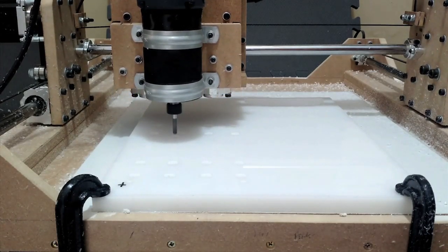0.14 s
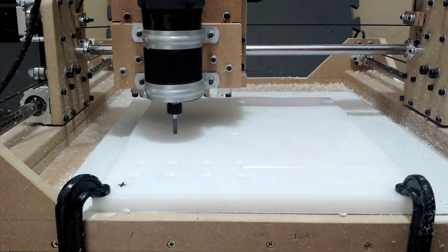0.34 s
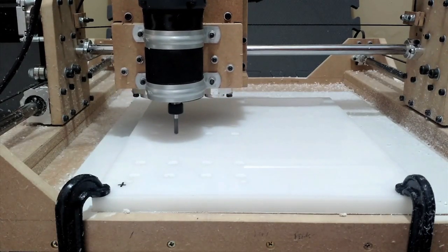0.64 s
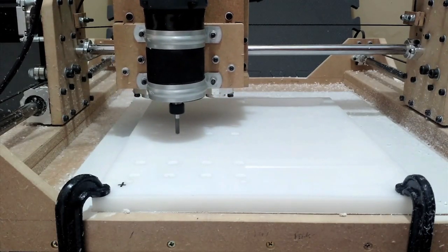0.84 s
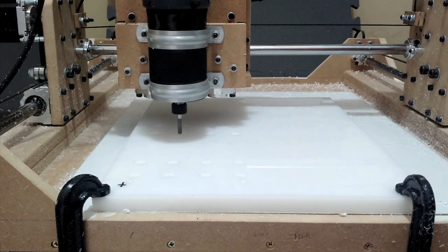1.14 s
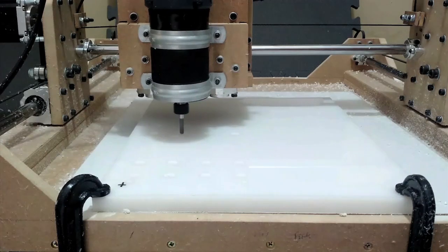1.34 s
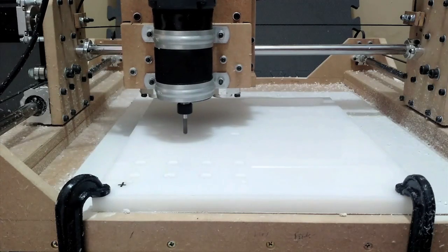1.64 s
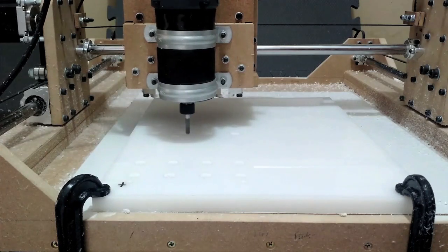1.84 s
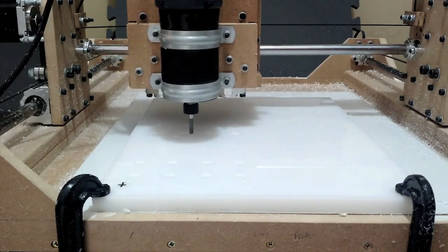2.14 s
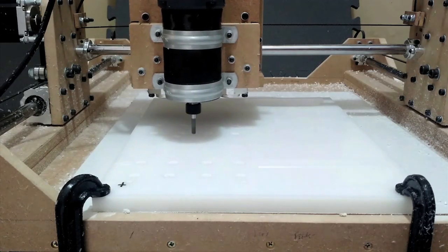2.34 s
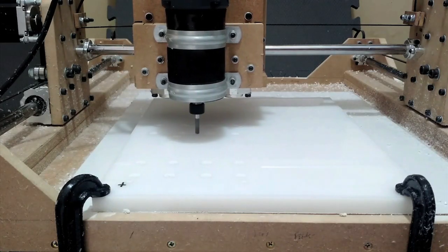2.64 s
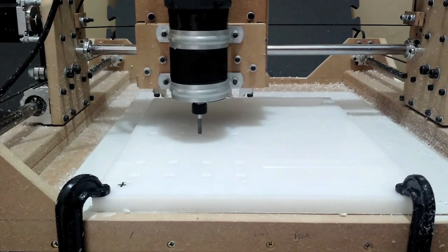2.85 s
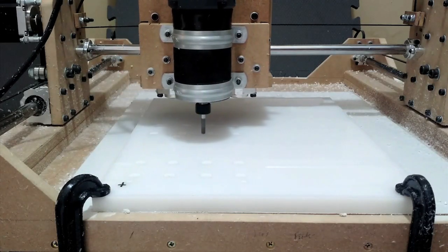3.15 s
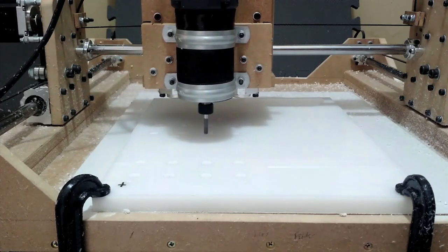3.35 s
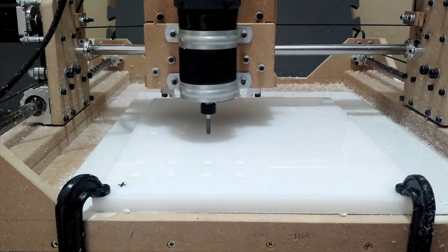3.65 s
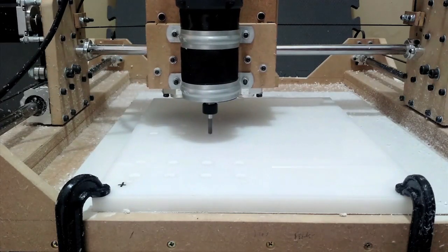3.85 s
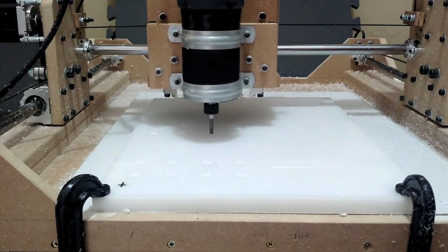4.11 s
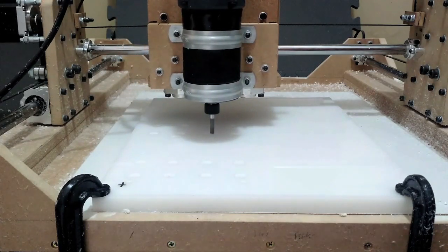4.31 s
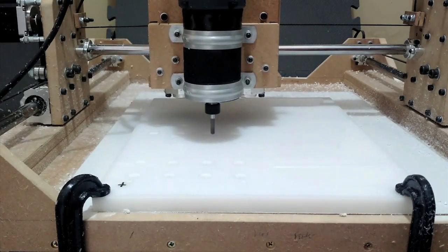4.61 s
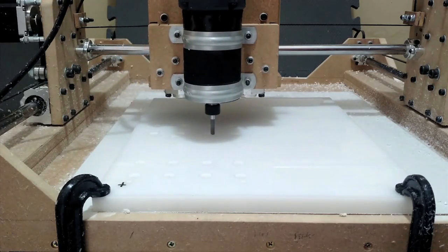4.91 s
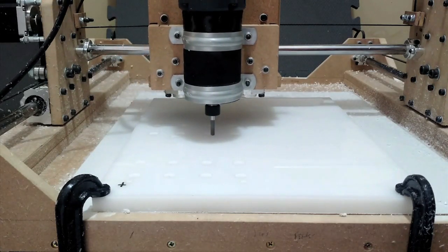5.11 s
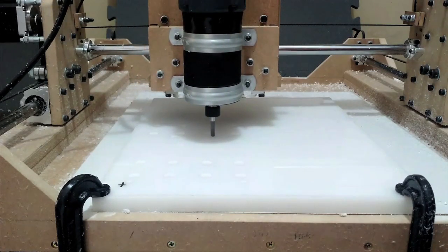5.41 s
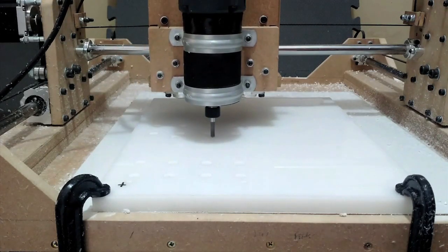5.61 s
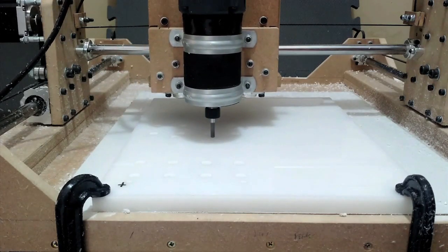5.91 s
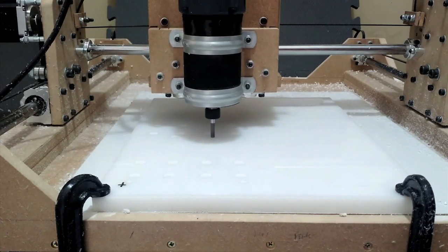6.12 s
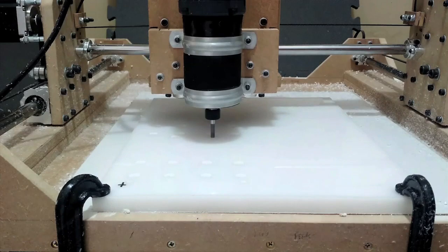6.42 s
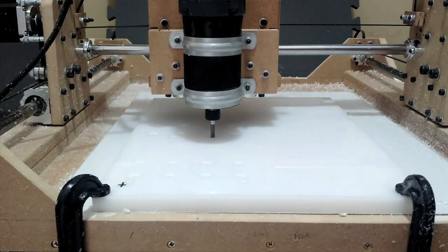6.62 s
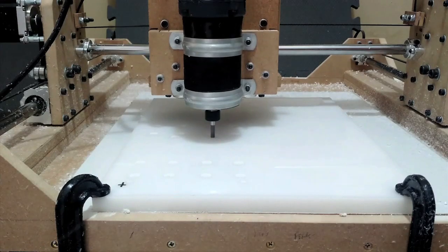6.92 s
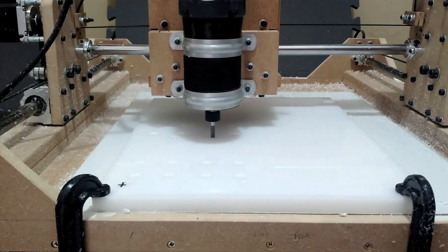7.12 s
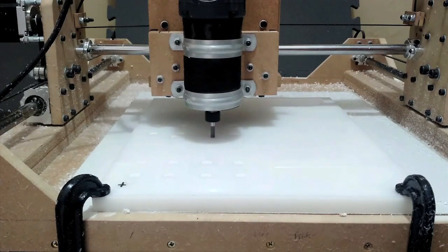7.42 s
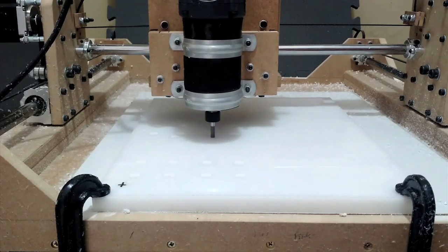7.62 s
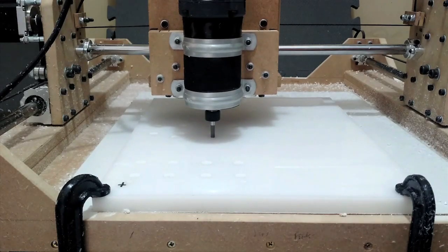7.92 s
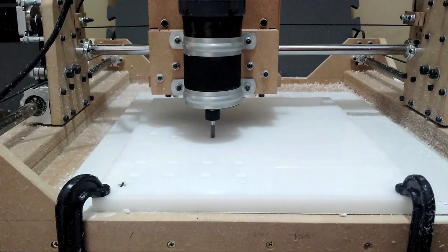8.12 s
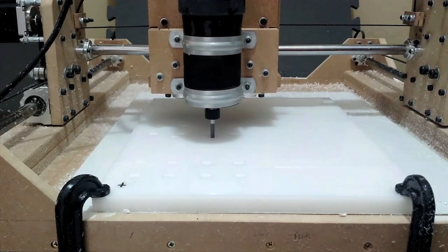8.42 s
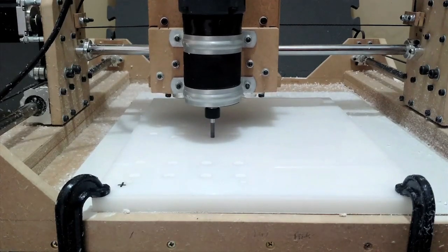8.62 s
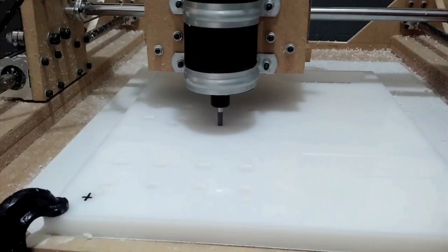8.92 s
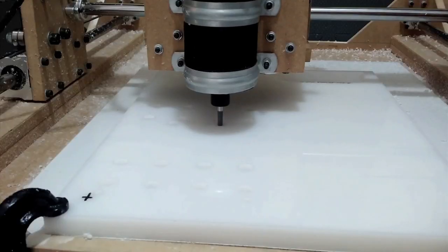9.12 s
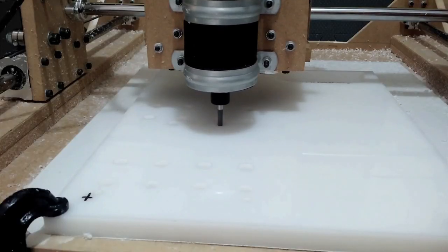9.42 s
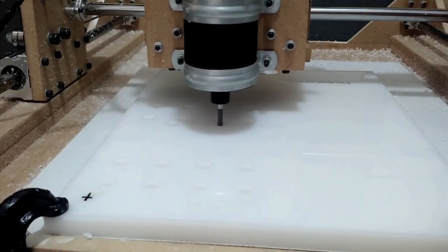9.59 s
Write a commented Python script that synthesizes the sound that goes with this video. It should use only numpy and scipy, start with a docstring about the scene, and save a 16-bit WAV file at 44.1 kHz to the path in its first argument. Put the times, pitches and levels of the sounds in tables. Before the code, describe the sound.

In a workshop, a small cutting machine's spindle runs without pause, a bright layered whine with a piercing whistle and raspy rushing air. Faint stepper hums enter soon after the start, changing pitch with each move. Past the midpoint the whine sags slightly, climbs back, then jumps abruptly higher with stronger top hiss. Heard close by, from a phone at the table edge.

```python
"""A small CNC router works on a plastic sheet in a workshop, heard from a phone at the edge of the table.
At first the spindle whines near 575 turns a second: sines at multiples of its speed, over coloured noise
for rushing air and a rasp. From 0.55 s stepper motors hum faintly at the step rate of each move. After 5 s
the whine sags in the cut to about 550 turns a second and climbs again from 6.8 s. From 7.9 s the pitch is
abruptly higher, with stronger top hiss and a narrow, rough hum; a second axis creeps until 9.2 s."""
import sys
import numpy as np
from scipy import signal
from scipy.fft import rfft, irfft
from scipy.io import wavfile
from scipy.ndimage import uniform_filter1d

SR = 44100
rng = np.random.default_rng(int(sys.argv[2]) if len(sys.argv) > 2 else 0)


def generate_wav(sig):
    """Save sig (samples, or channels by samples) to the path in sys.argv[1] as 16-bit PCM at SR."""
    pcm = np.round(np.clip(np.atleast_2d(sig).T, -1, 1) * 32767).astype(np.int16)
    wavfile.write(sys.argv[1], SR, pcm)


N = 429975
T = np.arange(N) / SR
HZ = np.maximum(np.arange(N // 2 + 1) * SR / N, 1)  # spectrum bins, kept above 0 for the logarithm
MOVE_FADE_S = 0.025  # attack and release of a move


def undb(db):
    """Decibels to gain: amplitude grows tenfold every 20 dB."""
    return 10 ** (np.asarray(db) / 20)


def curves(table):
    """Envelopes by linear interpolation in time: one for each column after the first."""
    s, *columns = np.transpose(table)
    return [np.interp(T, s, column) for column in columns]


def over_hz(table):
    """Spectral envelope by interpolation of (Hz, value) points on a log-frequency axis."""
    hz, value = np.transpose(table)
    return np.interp(np.log(HZ), np.log(hz), value)


def walk(rate):
    """Low-passed random fluctuation of standard deviation 1 that changes about rate times a second."""
    s = np.arange(0, N / SR, 1 / 2000)
    hz = np.arange(len(s) // 2 + 1) * SR / N
    lowpass = np.exp(-(hz / rate) ** 2)
    slow = irfft(rfft(rng.standard_normal(len(s))) * lowpass, len(s))
    return np.interp(T, s, slow / slow.std())


def gate(start, end, ramp_s):
    """Trapezoidal envelope: rises from 0 to 1 in ramp_s, holds, and is back at 0 by the end."""
    return np.clip(np.minimum(T - start, end - T) / ramp_s, 0, 1)


def resonance(hz, centre_hz, width_hz):
    """Lorentzian resonance curve, 1 at the centre."""
    return 1 / (1 + (2 * (hz - centre_hz) / width_hz) ** 2)


def tone(phase, db, pan_db=0, lead=0):
    """A sine of given rms level, with a level (dB) and phase (rad) difference between the two ports."""
    ports = [undb(db + side * pan_db) * np.sin(phase + side * lead) for side in (.5, -.5)]
    return np.sqrt(2) * np.array(ports)


def two_ports(phase, left_db, right_db, lead):
    """A sine with its own level at each port: mean level plus level difference."""
    return tone(phase, (left_db + right_db) / 2, left_db - right_db, lead)


def rumbles(fade_s=.05, bed_db=-106, bed_hz=35, bed_width_hz=40, surge_db=5):
    """Band-limited noise: a deep bed independent at each port, and soft, higher rumbles common to both."""
    # soft rumbles: start_s, end_s, level_db
    rumble_times = [(.1, .38, -90), (2.92, 3.4, -90), (5.36, 5.56, -91)]
    # their band: centre_hz, width_hz
    rumble_band = (89, 45)
    low = irfft(rfft(rng.standard_normal(N)) * resonance(HZ, *rumble_band), N)
    bed = irfft(rfft(rng.standard_normal((2, N))) * resonance(HZ, bed_hz, bed_width_hz), N)
    bed = bed / bed.std() * undb(bed_db + surge_db * walk(4))
    envelope = sum(undb(db) * gate(start, end, fade_s) for start, end, db in rumble_times)
    return bed + low / low.std() * envelope


def steppers(waver_db=0.6, octave_db=-13, half_db=-9, jitter=0.008, ramp_jitter=0.04,
             ramp_db=-2.5, ramp_flutter_db=3):
    """Periodic steps give a tone at the step rate; uneven steps double the period, an octave below."""
    # carriage moves, level before frame lift and ramp change:
    # start_s, end_s, entry_hz, cruise_hz, exit_hz (step rates), to_cruise_s, from_cruise_s, level_db
    moves = [(.55, 2.68, 122, 149.6, 130, 0.269, .25, -88),
             (4.03, 4.92, 154.7, 249.5, 166, 0.22, 0.22, -82.5),
             (4.98, 6.42, 166, 166, 150, .05, 0.074, -88.5),
             (6.42, 7.1, 205, 194.6, 180, 0.098, 0.092, -87.5), (6.96, 7.87, 155, 249.6, 200, .22, .1, -86),
             (7.85, 10.8, 200, 250, 250, 0.062, .05, -85)]
    # resonance of the frame over step rate: centre_hz, width_hz, lift_db
    frame = (139, 13, 7.2)
    # slow move of a second axis: start_s, end_s, step_rate_hz, level_db
    creep_move = (7.87, 9.17, 46, -90)
    feed = 0
    frame_hz, frame_width_hz, lift_db = frame
    for start, end, entry_hz, cruise_hz, exit_hz, rise_s, fall_s, db in moves:
        corners_s = [start, start + rise_s, end - fall_s, end]
        hz = np.interp(T, corners_s, [entry_hz, cruise_hz, cruise_hz, exit_hz])
        ramping = np.clip(np.abs(hz - cruise_hz) / 20, 0, 1)
        ragged = (jitter + ramp_jitter * ramping) * walk(30)
        phase = 2 * np.pi * np.cumsum(hz * (1 + ragged)) / SR
        db = db + ramping * (ramp_db + ramp_flutter_db * walk(14))
        uneven = undb(half_db) * np.clip((hz - 200) / 50, 0, 1)  # only at the faster feed
        hum = np.sin(phase) + undb(octave_db) * np.sin(2 * phase) + uneven * np.sin(phase / 2)
        level = undb(db + lift_db * resonance(hz, frame_hz, frame_width_hz))
        feed = feed + level * gate(start, end, MOVE_FADE_S) * hum
    start, end, creep_hz, creep_db = creep_move
    creep = undb(creep_db) * gate(start, end, MOVE_FADE_S) * np.sin(2 * np.pi * creep_hz * T)
    return np.sqrt(2) * (feed + creep) * undb(waver_db * walk(5.6))


def fan(shaft, churn=0.62, churn_hz=30, lead=.2):
    """Blade-passing tone at 7 times the shaft speed; chopped uneven air smears part of it into a band."""
    # rough fan tone: time_s, level_db
    fan_level = [(0, -57), (2, -56), (4.5, -56.5), (5.5, -54), (6.2, -56), (7.4, -59), (8.5, -53),
                 (9.75, -57)]
    db, = curves(fan_level)
    direct, quadrature = (tone(7 * shaft + shift, db, lead=lead) for shift in (0, np.pi / 2))
    smeared = direct * walk(churn_hz) + quadrature * walk(churn_hz)
    return (direct + churn * smeared) / np.sqrt(1 + 2 * churn ** 2)  # the mean power stays the same


def rush(shaft, pulsing=0.04, sputter_db=0.37, roar_db=-57.5, wander_db=0.58, hiss_follow=0.64):
    """Broadband noise filtered by housing resonances; its rasp is amplitude-modulated once a turn."""
    # broad colour, relative spectral level: frequency_hz, level_db
    rush_colour = [(25, -37), (80, -33), (125, -26), (200, -24.5), (310, -18.5), (500, -7), (760, -4),
                   (1400, -3.5), (2200, -3.5), (2600, -6), (3000, -4), (4200, 3.5), (6700, -3),
                   (8200, -7.5), (11300, -13.5), (14000, -19.5)]
    # resonances of housing and frame: centre_hz, width_hz, lift_db
    housing = [(850, 39, 6), (923, 36, 6.5), (986, 97, 6), (1176, 120, 3.5), (1430, 32, 4.5),
               (1570, 104, 6), (1704, 94, 3), (1930, 29, 5), (2870, 47, 8), (3627, 380, 6), (3900, 57, 3.5),
               (4042, 110, 6), (4550, 670, 1.5), (9260, 960, 2.5), (13300, 1500, 7.5)]
    # likeness of the noise at the two ports: frequency_hz, correlation (-1 to 1)
    likeness = [(40, -0.71), (150, 0.22), (700, 0.67), (950, 0.98), (1350, 1), (1650, 0.99), (2100, -0.12),
                (2480, -0.55), (2640, -0.85), (2950, -0.28), (3400, 0.91), (3750, 0.93), (4200, 0.95),
                (4750, -0.087), (5250, -0.72), (6700, 0.79), (8200, -0.55), (10000, 0.54), (11400, -0.35),
                (12900, 0.8), (14300, -0.72)]
    # dip in the shared part of the noise near 2.6 kHz: centre_hz, width_hz, depth (0 to 1)
    shared_dip = (2620, 270, .85)
    # airy hiss above the rasp: time_s, level_db
    air_level = [(0.0, -50.5), (0.78, -53), (2.19, -51.5), (2.82, -54), (3.27, -52), (4.35, -53.5),
                 (4.62, -50.5), (5.19, -53.5), (5.91, -51.5), (6.51, -52), (7.86, -51), (9.74, -54.5)]
    # level of the rasp, with small random rises and dips: time_s, level_db
    rasp_level = [(0.0, -46.0), (0.51, -45.5), (1.05, -48), (1.26, -45.5), (2.04, -45.5), (2.25, -44.5),
                  (2.34, -49), (2.58, -45), (2.61, -48), (2.97, -45), (3.18, -48.5), (3.24, -46),
                  (3.54, -47.5), (3.6, -44.5), (4.2, -47.0), (4.74, -44.0), (4.77, -48), (5.07, -44.0),
                  (5.13, -47), (5.73, -45.5), (6.09, -48.5), (6.33, -45), (6.39, -48.5), (6.54, -45),
                  (6.75, -49), (6.99, -45), (7.17, -46.5), (7.65, -46.5), (7.74, -44.5), (8.07, -45),
                  (8.61, -45.5), (9.74, -47.5)]
    # top hiss, stronger from 7.9 s: time_s, level_db
    hiss_level = [(0, -64), (1.2, -61.5), (3.7, -61), (4.3, -62.5), (6.3, -64), (7.3, -62.5), (7.88, -67),
                  (7.9, -59.5), (9.75, -57)]
    # narrow, rough hum heard late: centre_hz, width_hz, level_db
    late_hum = (900, 24, -64)

    db = over_hz(rush_colour) + sum(lift * resonance(HZ, hz, width) for hz, width, lift in housing)
    # correlation is joined as an angle
    angles = [(hz, np.arccos(np.clip(c, -.999, .995))) for hz, c in likeness]
    alike = np.cos(over_hz(angles))
    mid, side = (rfft(rng.standard_normal(N)) * undb(db) * np.sqrt(1 + s * alike) for s in (1, -1))
    dip_hz, dip_width_hz, depth = shared_dip
    mid = mid * (1 - depth * resonance(HZ, dip_hz, dip_width_hz) ** 2)
    ports = np.array([mid + side, mid - side])

    def part(share, lo, hi):
        """Filtered register of the rush, scaled by the power of the unfiltered rush from lo to hi Hz."""
        power = np.sum(np.abs(ports[:, (HZ > lo) & (HZ < hi)]) ** 2) / N ** 2
        return irfft(ports * share, N) / np.sqrt(power)

    # crossovers between the registers
    low = 1 / (1 + (HZ / 2400) ** 8)
    high = 1 - 1 / (1 + (HZ / 5100) ** 16)
    top = 1 - 1 / (1 + (HZ / 9800) ** 14)
    roar, rasp = part(low, 720, 1060), part(1 - low - high, 3000, 5000)
    air, hiss = part(high - top, 5300, 8500), part(top, 9800, 14000)

    roar = roar * undb(roar_db + 1.64 * walk(2.0))
    air = air * undb(curves(air_level)[0] + 0.75 * walk(14))
    rasp_db = curves(rasp_level)[0] + wander_db * walk(11.0)
    rasp = rasp * (1 + pulsing * np.cos(shaft)) * undb(rasp_db + sputter_db * walk(180))
    # the top hiss leans right and swells a little with the rasp
    hiss_pan_db = np.array([[-.8], [.8]])
    follow_db = hiss_follow * (rasp_db - rasp_db.mean())
    hiss_db = curves(hiss_level)[0] + hiss_pan_db + follow_db + 0.66 * walk(6)
    hum_hz, hum_width_hz, hum_db = late_hum
    hum = irfft(rfft(rng.standard_normal(N)) * resonance(HZ, hum_hz, hum_width_hz), N)
    hum = hum / hum.std() * undb(hum_db) * (T > 7.895)  # heard from here on (s)
    return roar + rasp + air + hiss * undb(hiss_db) + hum


def whistle(shaft, speed, fade_db=0.94, sway=0.67):
    """High rotor tone interfering with its own reflections, which grow while the pitch glides."""
    # level at each port: time_s, left_db, right_db
    whistle_level = [(0.0, -68, -48), (0.63, -54, -45.5), (1.11, -70, -47.5), (1.35, -60.5, -51.5),
                     (1.83, -60, -50), (2.07, -51, -54), (2.43, -58.5, -62), (2.52, -57.0, -55),
                     (3.6, -56.5, -52.0), (3.84, -62.5, -49), (4.26, -72, -55), (4.5, -76, -55),
                     (4.74, -55, -55.0), (4.98, -55, -58), (5.58, -52.5, -54), (5.73, -51.5, -65),
                     (6.24, -55.5, -53), (6.75, -51.5, -62), (6.96, -56.0, -52.5), (7.38, -47.5, -51.0),
                     (7.53, -57.0, -48), (7.98, -51.5, -52), (8.19, -52, -49), (8.58, -58.5, -48),
                     (9.0, -49.5, -48), (9.74, -57, -44.5)]
    # break-ups, where the ports also swing through opposite phase: time_s, dip_db
    dropouts = [(2.41, 6), (4.92, 4), (5.3, 6), (5.44, 2), (5.68, 3), (6.11, 2), (7.13, 5), (7.31, 3),
                (7.7, 3), (7.88, 3)]
    dropout_s = .035  # half length
    order = 16  # multiple of the shaft speed
    reflected_share, glide_share = .12, .3  # reflection at steady speed, and what a full glide adds

    slope = np.minimum(np.abs(np.gradient(speed)) * SR, 20)  # Hz per second
    glide = np.clip(uniform_filter1d(slope, SR // 2) / 12, 0, 1)
    left, right = curves(whistle_level)
    swell, lead = fade_db * walk(7), sway * walk(4.1)
    for s, dip_db in dropouts:
        bell = np.exp(-((T - s) / dropout_s) ** 2)
        swell, lead = swell - dip_db * bell, lead + np.pi * bell
    direct, quadrature = (two_ports(order * shaft + shift, left + swell, right + swell, lead)
                          for shift in (0, np.pi / 2))
    reflected = sum(wave * np.array([walk(24), walk(24)]) for wave in (direct, quadrature))
    share = reflected_share + glide_share * glide
    return (direct + share * reflected) / np.sqrt(1 + 2 * share ** 2)


def spindle(shaft, flutter_db=1.0, ring_fade_db=2.0, fade_db=4.0, eighth_fade_db=2.5):
    """Harmonics of the shaft speed; standing waves make each port hear them swell and fade."""
    # harmonics 1 to 6 of the shaft, each: time_s, level_db
    first_level = [(0.0, -55), (2.29, -64.5), (2.98, -53), (4.35, -60), (4.92, -52.5), (5.45, -57.5),
                   (6.3, -52), (6.86, -63), (7.21, -56), (7.58, -69.5), (7.84, -59), (8.6, -67.5),
                   (9.75, -62.5)]
    second_level = [(0.0, -51.5), (0.45, -58), (1.24, -51), (2.29, -52.0), (2.44, -55.5), (3.33, -48),
                    (4.43, -55), (5.42, -48.5), (5.57, -59), (5.82, -52), (6.12, -57.5), (6.27, -50.0),
                    (7.01, -51.5), (7.21, -61), (7.36, -51), (7.46, -59), (8.66, -48.5), (9.75, -56.0)]
    third_level = [(0.0, -52), (0.96, -59.0), (2.19, -50), (2.64, -56.0), (3.9, -50), (4.02, -57),
                   (4.35, -51.5), (4.44, -65), (4.77, -67.5), (4.83, -60), (5.4, -46.0), (5.76, -53),
                   (6.45, -55), (6.75, -70), (6.93, -50.5), (7.23, -54.5), (7.44, -66), (7.83, -55.5),
                   (8.4, -64), (8.85, -67), (8.97, -54.5), (9.74, -62)]
    fourth_level = [(0, -64), (2.06, -60), (2.84, -66), (3.78, -60), (4.23, -65.5), (4.5, -62), (4.92, -70),
                    (5.07, -60.5), (5.43, -65.5), (6.33, -54), (7.41, -65.5), (9.03, -64), (9.75, -70)]
    fifth_level = [(0, -66), (.65, -58), (1.7, -73), (3.3, -68.5), (5.1, -59), (5.5, -60), (6.0, -54),
                   (7.7, -64), (8.0, -60), (9.75, -57)]
    sixth_level = [(0, -62), (1.3, -63), (2.2, -55.5), (3.3, -57.5), (4.2, -61), (5.1, -59), (5.5, -59.5),
                   (6.5, -58), (7.1, -61), (7.6, -61.5), (8.2, -64), (9.75, -63)]
    # ringing eighth harmonic: time_s, left_db, right_db
    eighth_level = [(0, -66, -66), (.42, -58, -61), (.65, -58, -57), (1.3, -52, -50), (1.8, -59, -62),
                    (2.4, -51.5, -66), (3.68, -49.5, -54), (4.1, -53, -64), (4.75, -53, -71),
                    (4.98, -51.5, -49), (5.35, -57, -64), (6, -50, -54), (6.12, -61, -61), (6.4, -51, -56),
                    (7.7, -51, -54), (8.08, -57, -62), (8.3, -52, -59), (9.75, -58, -67)]
    # twelfth harmonic, which comes out as the pitch climbs again: time_s, level_db
    twelfth_level = [(0, -66), (6.95, -68), (7.25, -60), (7.8, -63), (8, -72)]
    # weaker harmonics: order (multiple of the speed), level_db, port_phase_rad
    overtones = [(9, -67.5, 3), (10, -69.5, 0), (11, -71, 1), (13, -73.5, 0), (14, -73.5, -0.5)]

    first, second, third, fourth, fifth, sixth, twelfth = (curves(table)[0] for table in (
        first_level, second_level, third_level, fourth_level, fifth_level, sixth_level, twelfth_level))
    out = tone(shaft, first + flutter_db * walk(6.8), lead=0.67)
    out += tone(2 * shaft, second + flutter_db * walk(8.1), lead=0.05)
    out += tone(3 * shaft, third + flutter_db * walk(12), pan_db=-1.0, lead=0.2)
    out += tone(4 * shaft, fourth + ring_fade_db * walk(11.7), pan_db=-6.5, lead=0.89)
    # the fifth reaches the ports near opposite phase
    out += tone(5 * shaft, fifth + ring_fade_db * walk(8), lead=np.pi + .2 * walk(3.2))
    out += tone(6 * shaft, sixth + ring_fade_db * walk(11), pan_db=2.5)
    left, right = (db + eighth_fade_db * walk(16) for db in curves(eighth_level))
    out += two_ports(8 * shaft + 0.27 * walk(25), left, right, 0.55 + .7 * walk(2.1))
    out += tone(12 * shaft, twelfth + ring_fade_db * walk(15))
    for order, db, lead in overtones:
        out += tone(order * shaft, db + fade_db * walk(22), 2 * walk(0.83), lead + 0.62 * walk(0.92))
    return out


def scene():
    """Phase is the integral of speed: one slightly unsteady shaft sets whine, whistle, fan and rasp."""
    # pitch of the whine, which sags in the cut, climbs again and is abruptly higher from 7.9 s:
    # time_s, speed_hz (turns a second)
    spindle_speed = [(0, 574.2), (0.8, 573.1), (1.3, 573.1), (2, 574.7), (2.8, 576.1), (3.4, 575.8),
                     (4.7, 575.2), (5.3, 565.7), (5.9, 557.4), (6.35, 551.4), (6.55, 549.7), (6.8, 550.0),
                     (7.4, 558.7), (7.89, 564.9), (7.9, 571.8), (8.6, 573.5), (9.75, 572.7)]
    speed, = curves(spindle_speed)
    shaft = 2 * np.pi * np.cumsum(speed + 0.11 * walk(23.2)) / SR
    return rumbles() + steppers() + fan(shaft) + rush(shaft) + whistle(shaft, speed) + spindle(shaft)


def record(dry):
    """Low-pass filtering: the phone cuts the top with a steep elliptic slope."""
    top_hz = 14700
    return signal.sosfilt(signal.ellip(10, .2, 80, top_hz, fs=SR, output="sos"), dry)


dry = scene()
out = record(dry)
generate_wav(out)
```